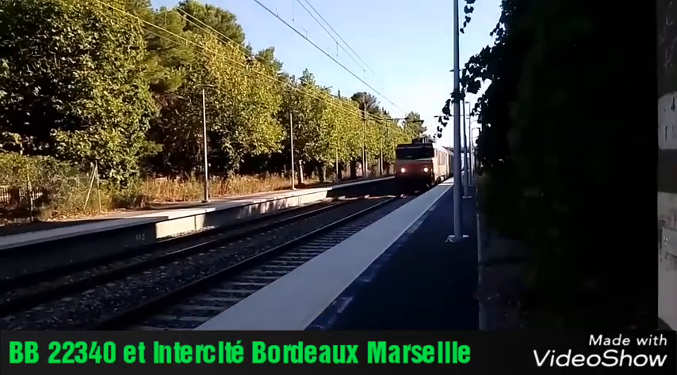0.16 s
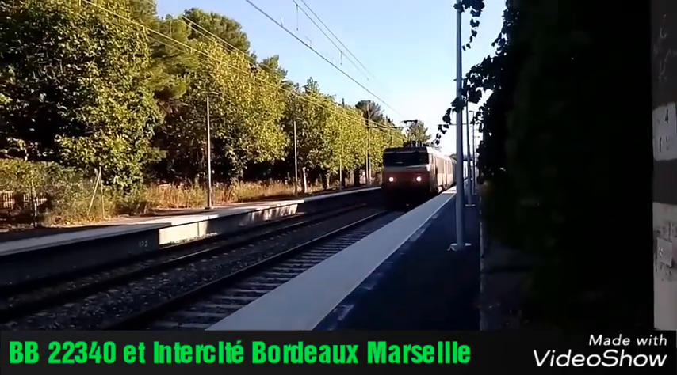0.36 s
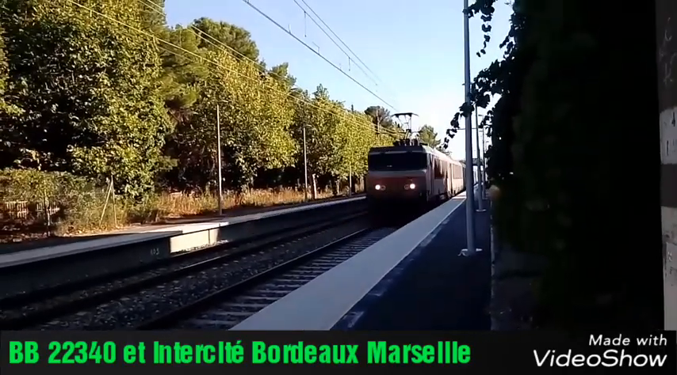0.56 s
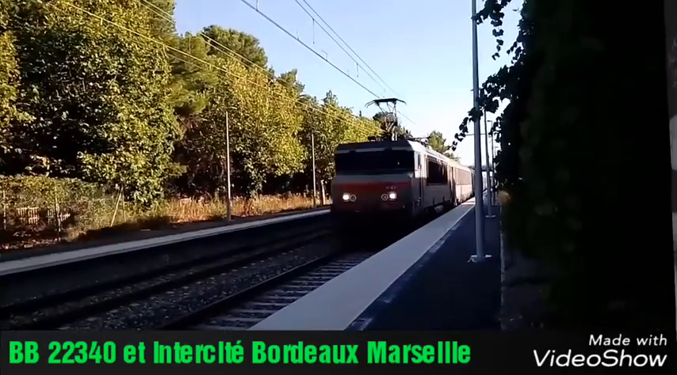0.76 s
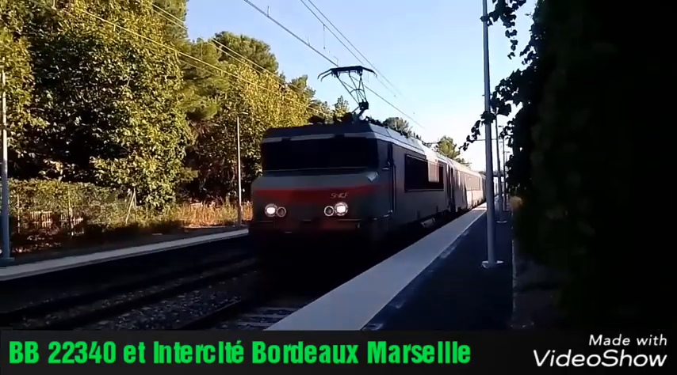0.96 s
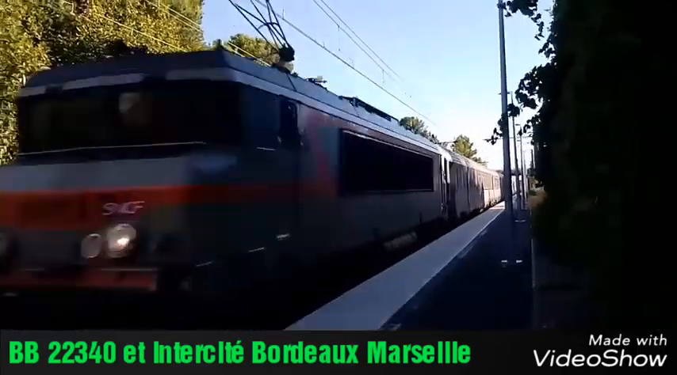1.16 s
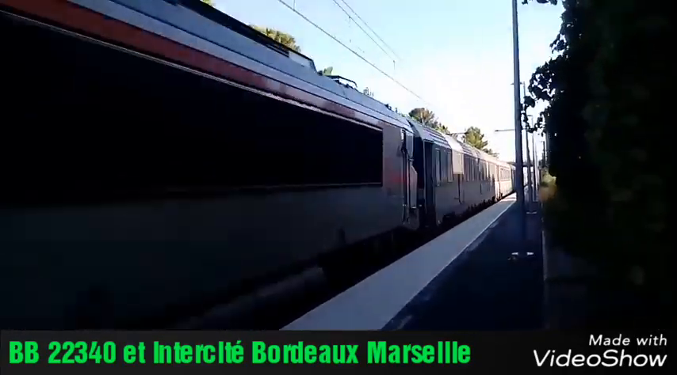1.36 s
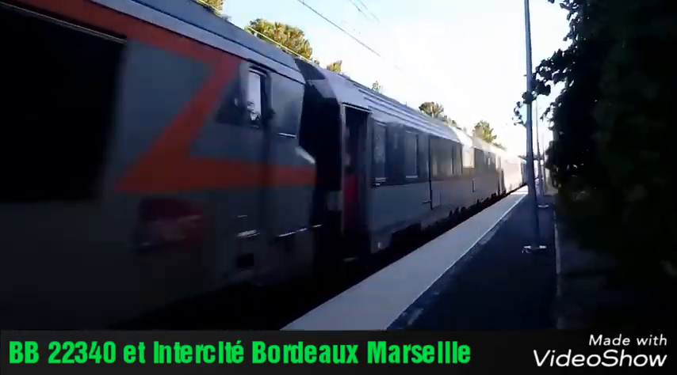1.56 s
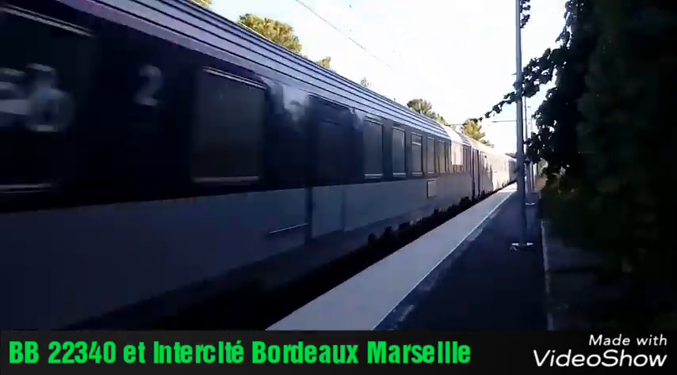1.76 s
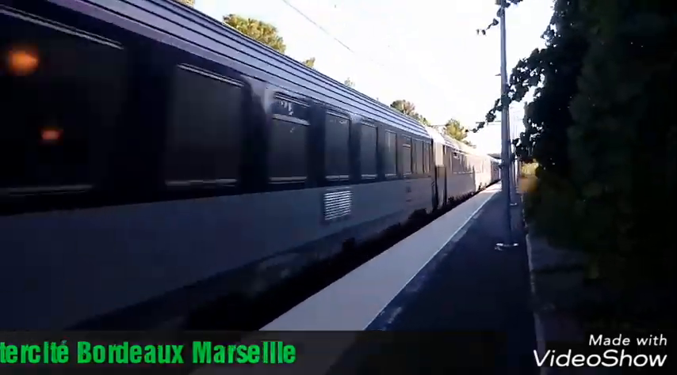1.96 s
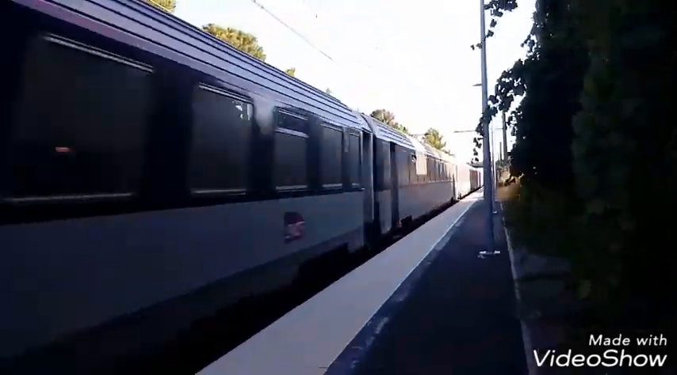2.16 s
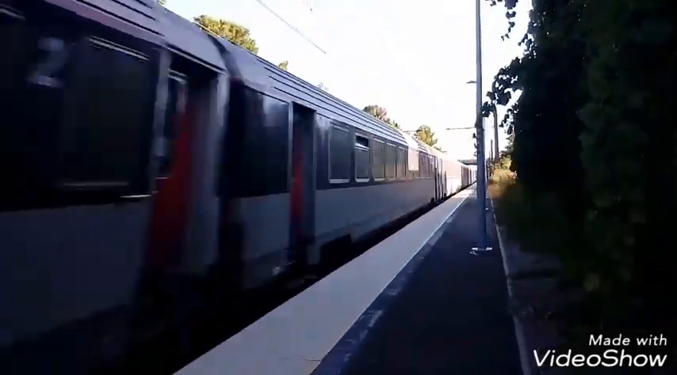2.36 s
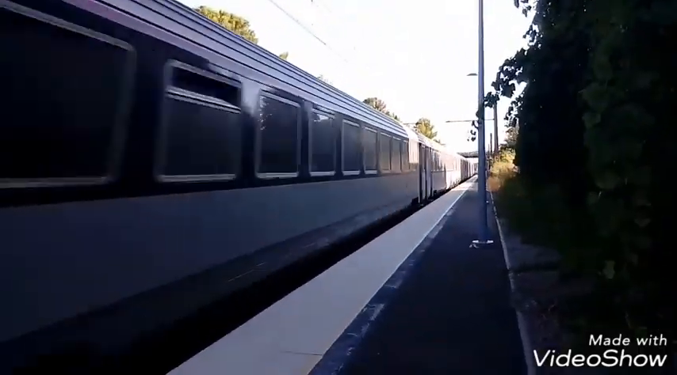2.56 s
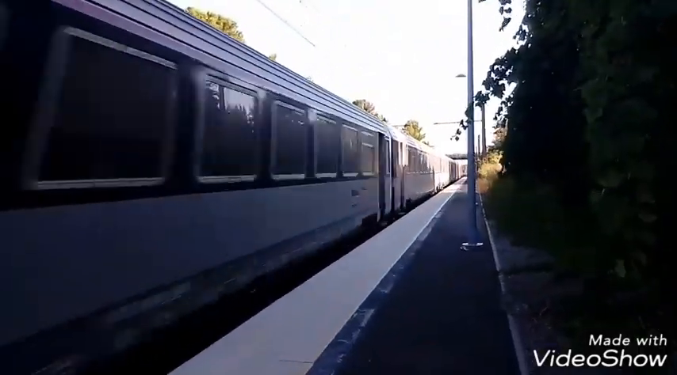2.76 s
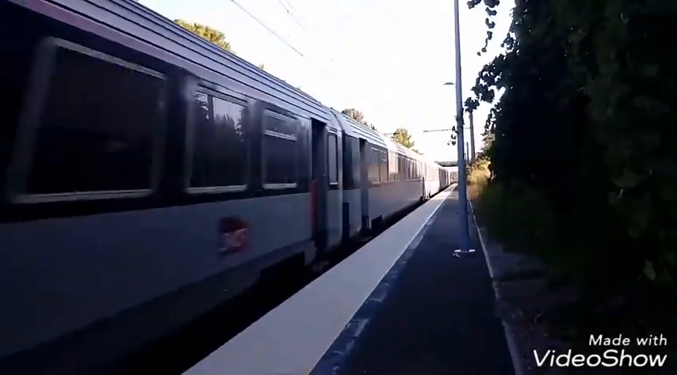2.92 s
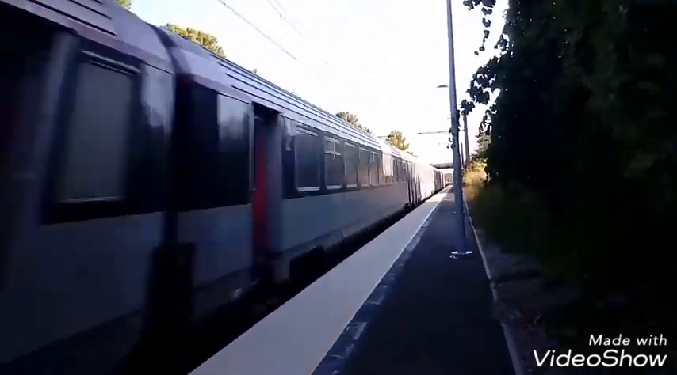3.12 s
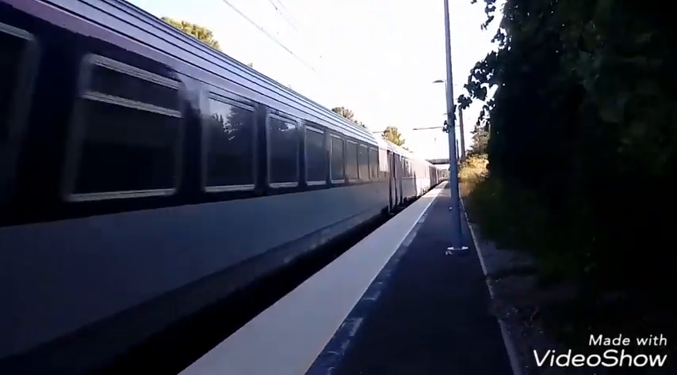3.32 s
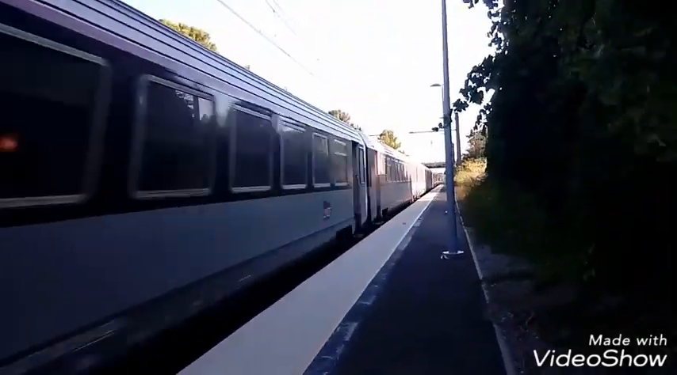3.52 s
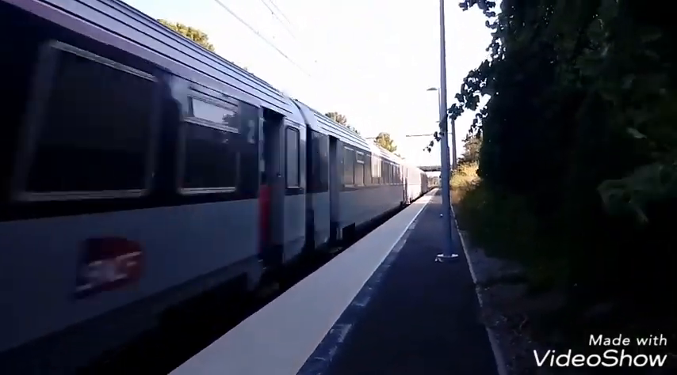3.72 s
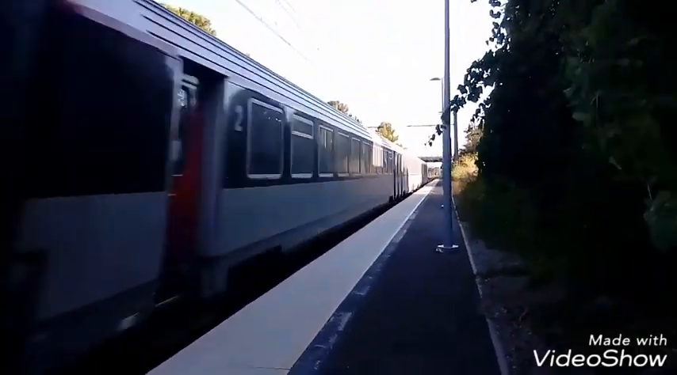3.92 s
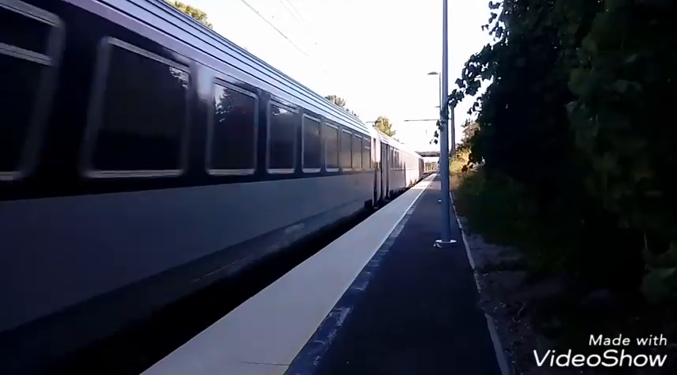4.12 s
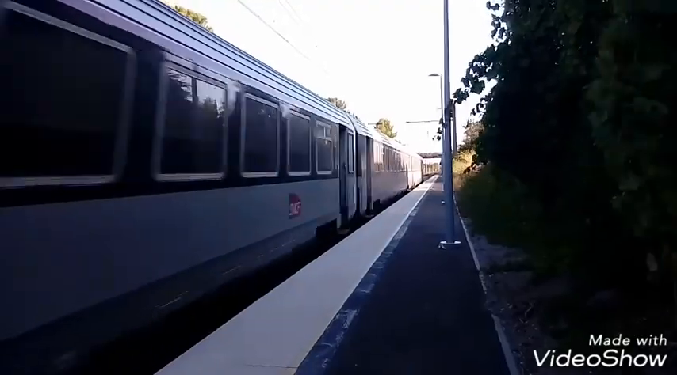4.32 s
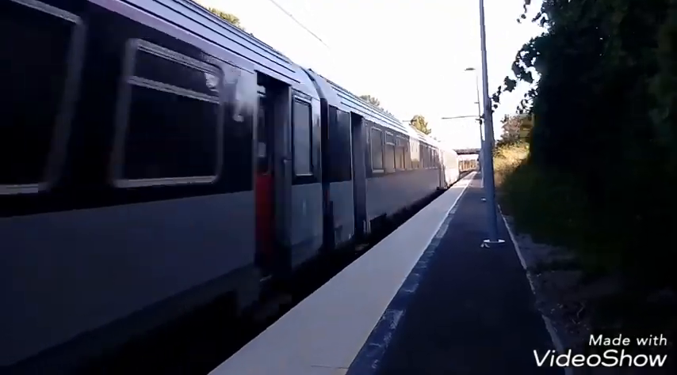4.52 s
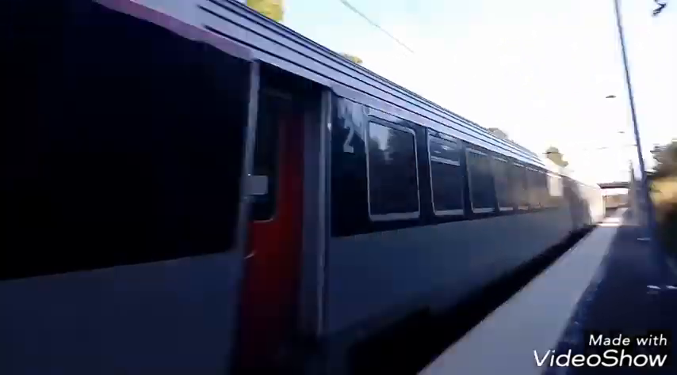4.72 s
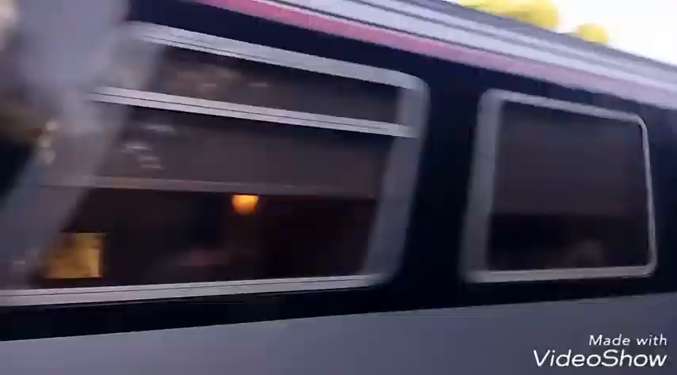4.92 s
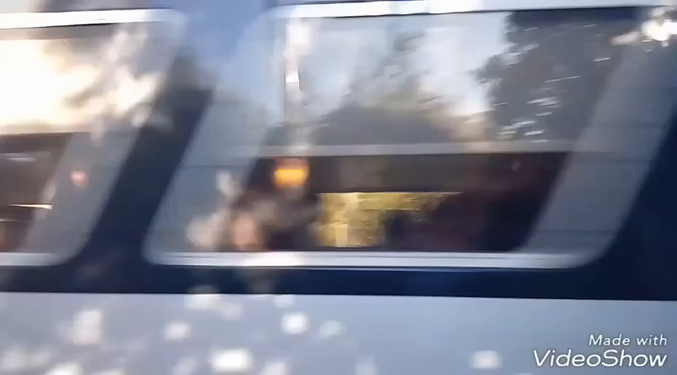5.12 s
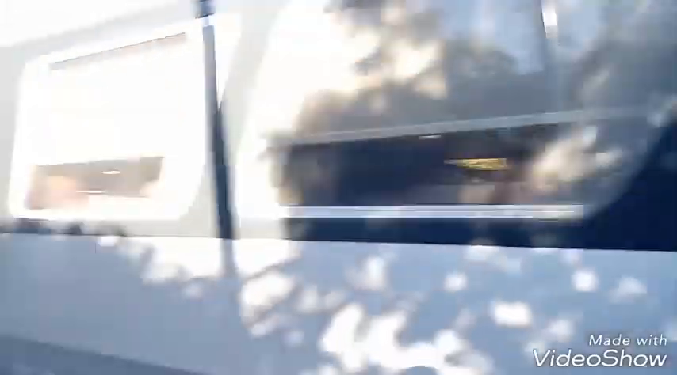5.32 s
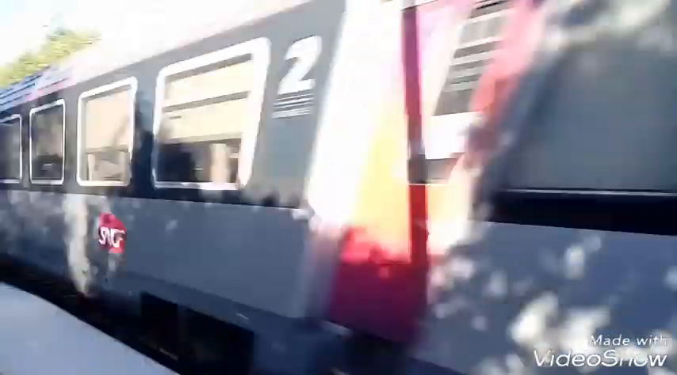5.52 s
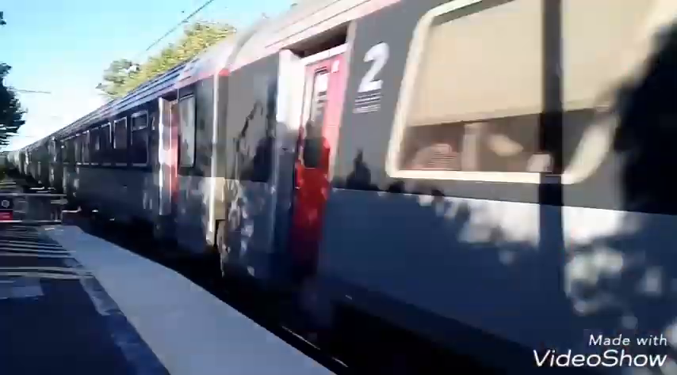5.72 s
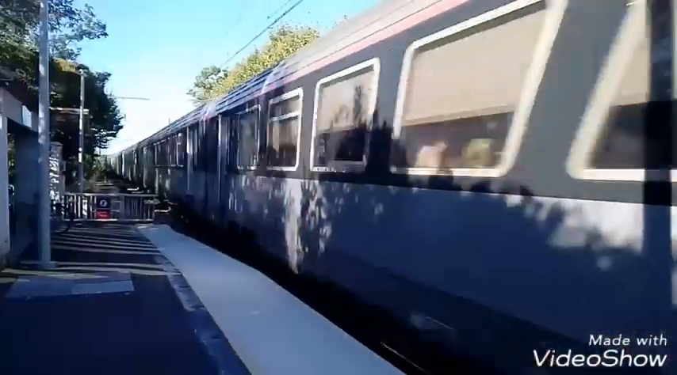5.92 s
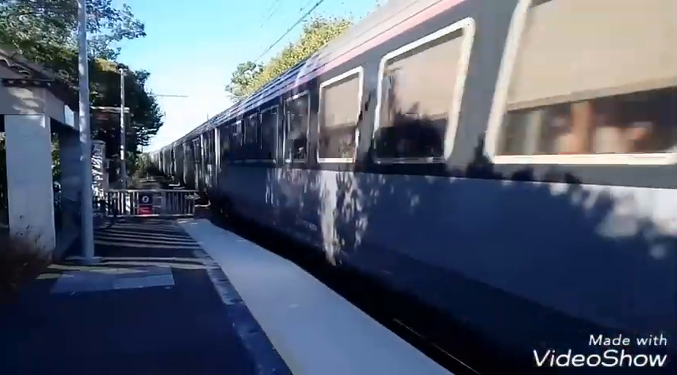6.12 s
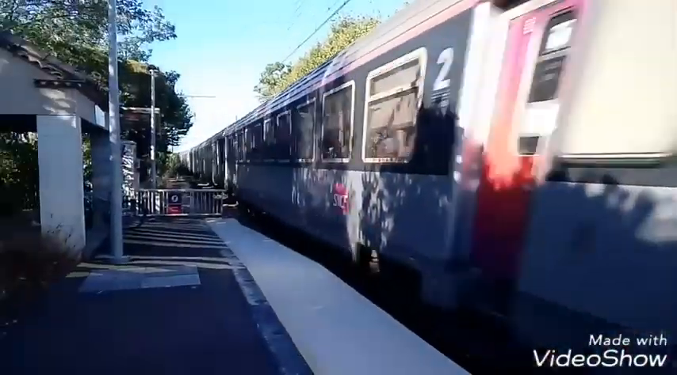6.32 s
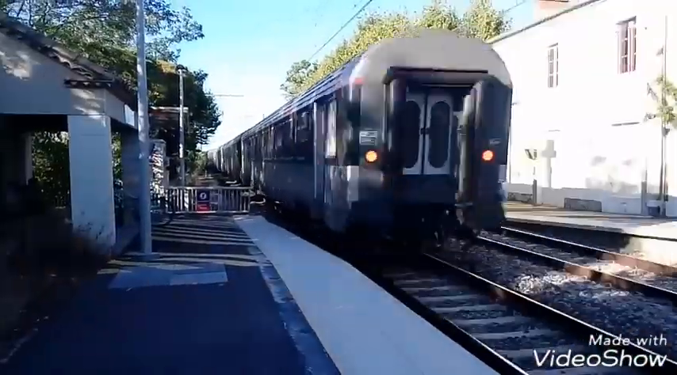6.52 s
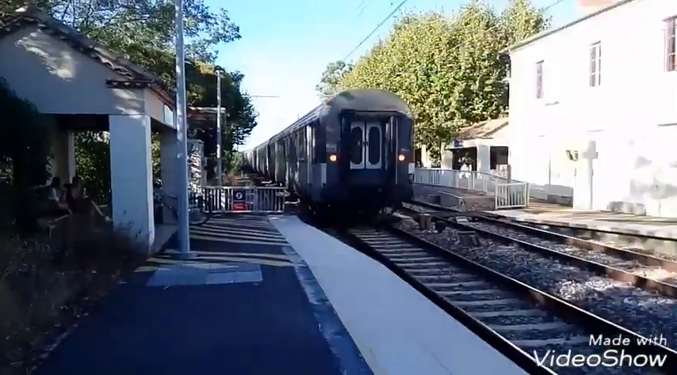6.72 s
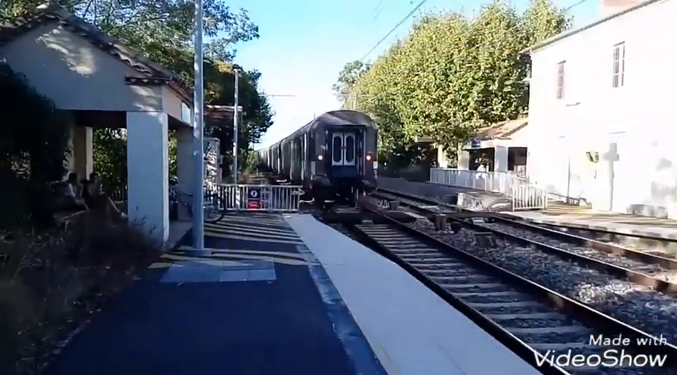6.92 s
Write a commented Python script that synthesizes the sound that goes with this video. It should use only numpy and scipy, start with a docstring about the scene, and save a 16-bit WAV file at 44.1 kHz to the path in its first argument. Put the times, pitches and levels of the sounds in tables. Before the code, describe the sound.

Rails sing as a fast train approaches, then it passes with a rumble, a hissing roar, pulsing wheel whine and thumping wind.

```python
"""Electric train passing a platform

The rails sing ahead of the train, then the locomotive rumbles and hums past a few metres away.
Rough wheels on rough rails make the track roar and hiss; each bogie's wheels ring, falling in pitch
by the Doppler effect, and a flange sometimes brushes the rail. The turbulent slipstream buffets a
single microphone in gusts, and their heavy bass drives its gain down."""
import sys
import numpy as np
from scipy import signal
from scipy.fft import rfft, irfft, next_fast_len
from scipy.io import wavfile
from scipy.ndimage import uniform_filter1d

SR = 44100
rng = np.random.default_rng(int(sys.argv[2]) if len(sys.argv) > 2 else 0)


def output_pcm(signal):
    """Save a mono or channel-first signal as 16-bit PCM at the path in sys.argv[1].

    Samples are clipped to [-1, 1] before scaling.
    """
    pcm = np.clip(np.atleast_2d(signal).T, -1, 1) * 32767
    wavfile.write(sys.argv[1], SR, np.round(pcm).astype(np.int16))


N = 307377
TIME = np.arange(N) / SR
SPEED_M_S, SOUND_M_S = 35.0, 343
TRACK_M, AXLE_SPACING_M = 4.6, 2.5  # listener to track, axle to axle
# passing bogies: t/s when abreast, whine f/Hz at rest, ring level/dB, hiss level/dB
BOGIES = [(1.96, 1814, -44.5, -33), (2.15, 1783, -30.5, -27), (2.6, 1810, -28, -28), (2.83, 1836, -29, -29),
          (3.35, 1790, -34.5, -35), (3.57, 1768, -30.5, -35), (4.1, 1776, -25, -32),
          (4.311, 1760, -24.5, -36), (4.79, 1785, -26, -34), (5.052, 1742, -26, -32.5),
          (5.57, 1787, -33.5, -33), (5.821, 1730, -27.5, -30.5), (6.371, 1820, -26, -26.5)]


def from_db(db):
    """Amplitude ratio of a level: 20 dB to a factor of ten."""
    return 10 ** (np.asarray(db) / 20)


def unit_rms(x):
    """Normalisation to unit mean power."""
    return x / np.sqrt(np.mean(x ** 2) + 1e-20)


def in_time(rows):
    """Linear interpolation of each level column at every sample."""
    t, *columns = np.transpose(rows)
    return [np.interp(TIME, t, column) for column in columns]


def fade_out(at_s, length_s):
    """A smooth (tanh) step from one to zero."""
    return .5 - .5 * np.tanh((TIME - at_s) / length_s)


def swell(at_s, sigma_s):
    """A Gaussian envelope of unit height."""
    return np.exp(-.5 * ((TIME - at_s) / sigma_s) ** 2)


def swells(rows):
    """Superposition of Gaussian envelopes, from rows of t/s, level/dB, sigma/s."""
    return sum(from_db(db) * swell(t, sigma) for t, db, sigma in rows)


def drift(rate_hz):
    """Random modulation of unit RMS: white noise through a two-pole low-pass."""
    step, settling = 40, 2000  # computed at every 40th sample
    pole = np.exp(-2 * np.pi * step * rate_hz / SR)
    white = rng.standard_normal(N // step + settling + 2)
    slow = signal.lfilter([1], [1, -2 * pole, pole * pole], white)[settling:]
    return np.interp(np.arange(N) / step, np.arange(len(slow)), unit_rms(slow))


def noise(spectrum):
    """Spectral shaping of white noise, to unit power; rows of f/Hz, relative level/dB."""
    size = next_fast_len(N)
    hz = np.maximum(np.arange(size // 2 + 1) * SR / size, 1)
    points, db = np.transpose(spectrum)
    gain = from_db(np.interp(np.log(hz), np.log(points), db))
    skirts = np.minimum(1, np.minimum(hz / points[0], points[-1] / hz)) ** 2
    return unit_rms(irfft(rfft(rng.standard_normal(size)) * gain * skirts)[:N])


def evened(x, span_s):
    """Division by the running RMS holds the power of a noise steady."""
    return x / np.sqrt(uniform_filter1d(x ** 2, int(span_s * SR)) + 1e-6)


def flutter(x, split_hz=900, depth_db=1.3):
    """Amplitude modulation: the low and high bands surge independently."""
    low = signal.sosfiltfilt(signal.butter(4, split_hz, fs=SR, output="sos"), x)
    return sum(band * unit_rms(from_db(depth_db * drift(14))) for band in (low, x - low))


def resonance(hz, width_hz, doppler=1):
    """A randomly driven mode: amplitude and phase wander at a rate set by its bandwidth."""
    phase = 2 * np.pi * np.cumsum(hz * doppler * np.ones(N)) / SR
    return (drift(width_hz) * np.cos(phase) + drift(width_hz) * np.sin(phase)) / np.sqrt(2)


def hum(hz, width_hz, pitch_ratio):
    """Forced vibration: a sustained tone wavering in frequency and amplitude."""
    phase = 2 * np.pi * np.cumsum(hz * pitch_ratio + width_hz * drift(2 * width_hz)) / SR
    return unit_rms(np.sin(phase) * from_db(4.3 * drift(18)))


def fly_by(abreast_s, distance_m):
    """Spherical spreading (one when abreast) and Doppler factor of a point on the train."""
    along = SPEED_M_S * (TIME - abreast_s)
    reach = np.hypot(along, distance_m)
    return distance_m / reach, 1 / (1 + SPEED_M_S / SOUND_M_S * along / reach)


def singing_rails():
    """As waveguides the rails carry vibration ahead of the train; they also ring out as it passes."""
    # rail modes: f/Hz, width/Hz, initial level/dB
    modes = [(744, 30, -46), (1142, 14, -39.5), (1207, 26, -44), (1328, 30, -44), (1837, 50, -42.5),
             (3105, 60, -44.5), (4210, 130, -51.5)]
    # brief rings: t/s, nominal f/Hz, width/Hz, level/dB, sigma/s
    rings = [(.54, 1215, 9, -37.5, .07), (.74, 1220, 9, -34, .05), (.79, 1145, 6, -37, .07),
             (1.86, 2620, 80, -35, .06), (1.93, 3110, 80, -34, .05), (2.36, 985, 6, -28.5, .08),
             (2.53, 4170, 120, -35, .05), (2.79, 4170, 100, -34.5, .04), (4.02, 3900, 400, -32, .025),
             (4.085, 1825, 8, -25, .022), (5.14, 1090, 6, -24.5, .035), (5.29, 1010, 6, -24.5, .045),
             (5.42, 1028, 6, -21.5, .055), (6.13, 2620, 65, -36, .12), (6.22, 3430, 90, -40, .14),
             (6.33, 4260, 55, -39.5, .3), (6.6, 2390, 50, -38.5, .14), (6.63, 1840, 22, -27, .09),
             (6.68, 3350, 50, -42, .13)]
    ahead = sum(from_db(db + 2.2 * drift(5)) * resonance(hz, width) for hz, width, db in modes)
    approach = from_db(5.1 * np.minimum(TIME, 1)) * fade_out(1.1, .35)
    ringing = sum(from_db(db) * swell(t, sigma) * hum(hz, width, pitch_ratio=.99)
                  for t, hz, width, db, sigma in rings)
    return ahead * approach + ringing


def wind_level():
    """Gusts and a light steady draught add in power; the result is in dB."""
    # gusts: onset t/s, duration/s, level/dB
    gusts = [(2.1, 0.63, -35), (3.035, 0.29, -32), (3.524, 0.042, -17.5), (3.605, 0.19, -15),
             (3.805, 0.052, -17.5), (3.882, 0.14, -23), (4, 0.065, -25.5), (4.103, 0.028, -24.5),
             (4.226, 0.099, -27.5), (4.462, 0.2, -28.5), (5.378, 0.075, -25), (5.487, 0.076, -30),
             (5.608, 0.16, -30), (5.767, 0.13, -25), (6, 0.31, -24.5), (6.394, 0.16, -27.5),
             (6.563, 0.22, -38), (6.721, 0.22, -21.5)]
    attack_s, release_s, draught_db = .017, .067, -42.5
    strength = sum(from_db(db) * (1 - fade_out(t, attack_s)) * fade_out(t + length, release_s)
                   for t, length, db in gusts)
    return 20 * np.log10(np.hypot(strength, from_db(draught_db)))


def slipstream():
    """Turbulent pressure thumps the microphone; the harder the gust, the brighter its spectrum."""
    # sharp blasts of air: t/s, level/dB, sigma/s
    blast_times = [(3.575, -24, .008), (3.607, -17.5, .006), (3.629, -16.5, 0.007), (3.658, -15.5, 0.005),
                   (3.672, -18.5, .004), (3.696, -18, .005), (3.718, -20, .008), (3.805, -21, .012),
                   (3.883, -16, .006), (3.899, -13, 0.007), (3.925, -20.5, .006), (3.95, -19.5, .004),
                   (3.964, -17, 0.007), (4.004, -21, .006), (4.1, -19.5, 0.005), (4.125, -24, .005),
                   (4.24, -27, 0.007), (5.42, -17.5, 0.008), (6.03, -27, .007), (6.211, -18, 0.006),
                   (6.819, -20, 0.006), (6.935, -23, .008)]
    # spectra of buffeting, finer turbulence, blasts and wake: f/Hz, relative level/dB
    buffet_spectrum = [(22, -18), (40, -19), (65, -2.5), (110, 2), (170, 0), (250, -7), (400, -12.5),
                       (800, -21.5)]
    churn_spectrum = [(50, -13), (120, -12), (250, 6), (450, -0.5), (700, -4.5), (1500, -7.5),
                      (4000, -48.5)]
    blast_spectrum = [(55, -7), (100, -5), (200, 0), (320, -1.5), (520, 1), (750, -3), (1000, -10),
                      (1600, -22)]
    wake_spectrum = [(130, -9), (230, 8), (300, 1), (450, -27)]
    wind_db = wind_level()
    arrived = 1 - fade_out(2.1, .1)
    eddies = from_db(2.7 * drift(38) - 3.5)
    gusting = 1 / (1 + from_db(-39.5 - wind_db) ** 2)  # deepens the lulls
    buffet = from_db(wind_db) * evened(noise(buffet_spectrum), .03)
    churn = from_db(1.59 * wind_db + 7.5) * noise(churn_spectrum)
    blasts = swells(blast_times) * evened(noise(blast_spectrum), .018)
    wake = from_db(-29) * swell(6.88, .08) * noise(wake_spectrum)  # behind the last coach
    return (buffet + churn) * gusting * eddies * arrived + blasts + wake


def crackles(top_hz=5200):
    """Cracks in the strongest gust: exponentially decaying noise, coloured by resonant filters."""
    # cracks: t/s, level/dB, decay time/s, f/Hz, width/Hz
    cracks = [(3.651, -19, .003, 4000, 3000), (3.66, -17, .015, 1100, 900), (3.692, -14, .014, 1900, 1300),
              (3.7145, -14, .003, 2600, 2600), (3.722, -12, .012, 1600, 1900),
              (3.74, -16.5, .004, 4000, 3000), (3.76, -11, .002, 1800, 1100), (3.78, -20, .02, 1700, 1200),
              (3.801, -8, .005, 2400, 1700), (3.81, -19, .03, 1400, 900)]
    out, white = 0, rng.standard_normal(N)
    for t, db, decay_s, hz, width in cracks:
        decay = np.exp(-np.minimum(np.abs(TIME - t) / decay_s, 20))
        burst = from_db(db) * (TIME >= t) * decay * white
        peak = signal.iirpeak(hz, hz / width, fs=SR)
        band = signal.lfilter(*peak, signal.lfilter(*peak, burst))
        out += band * np.sqrt(2 * SR / (np.pi * width))  # restores the power lost in filtering
    return signal.sosfilt(signal.butter(6, top_hz, fs=SR, output="sos"), out)


def flanges(distance_m=8.0):
    """Friction of a flange on the rail head hisses and excites wheel modes, which fall in pitch."""
    # brushing contacts: t/s, level/dB, sigma/s
    brushes = [(2.864, -33, 0.057), (5.713, -35.5, 0.14)]
    # their hiss: f/Hz, relative level/dB
    spectrum = [(3900, -12), (4450, 11), (4900, 7), (5500, -18.5)]
    # wheel rings: t/s, f/Hz at rest, width/Hz, level/dB, sigma/s
    rings = [(2.52, 2540, 80, -35, .07), (2.8, 1845, 25, -27.5, .035), (3.32, 1890, 30, -28, .05),
             (4.74, 1850, 30, -28, .07), (5.72, 2630, 38, -31, .1), (5.77, 3210, 80, -34, .11),
             (5.78, 4560, 140, -37.5, .09), (6.3, 2440, 70, -33.5, .07), (6.35, 3060, 100, -33.5, .05)]
    hiss = swells(brushes) * noise(spectrum)
    ringing = sum(from_db(db) * swell(t, sigma) * resonance(hz, width, fly_by(t, distance_m)[1])
                  for t, hz, width, db, sigma in rings)
    return hiss + ringing


def machinery():
    """Blowers, motors and running gear hum past, their pitch lowered by the Doppler effect."""
    # moving tones: t/s when abreast, f/Hz at rest, width/Hz, level/dB, distance/m
    tones = [(1.55, 674, 10, -28.5, 7), (1.68, 634, 4, -29, 3), (1.8, 680, 14, -32, 8),
             (1.55, 205, 12, -32, 14), (1.6, 60.35, 4, -35.5, 16), (3.28, 252, 3, -31, 1.9),
             (3.1, 975, 12, -29, 4), (6.95, 3260, 70, -43, 3.4)]
    out = 0
    for t, hz, width, db, distance_m in tones:
        nearness, doppler = fly_by(t, distance_m)
        unscreened = fade_out(t + .2, .08)  # the next vehicle soon hides the source
        out += from_db(db) * nearness * unscreened * hum(hz, width, doppler)
    return out


def locomotive():
    """Broadband noise: a heavy rumble and a gritty rush of air, gone once the coaches arrive."""
    # approach: t/s, rumble level/dB, air level/dB
    levels = [(0, -39, -47.5), (0.45, -38.5, -41), (0.8, -30, -37), (1.25, -26, -33.5), (1.55, -20.5, -32),
              (1.8, -25, -32.5), (1.95, -31, -32)]
    # spurts of air: t/s, level rise/dB, sigma/s
    spurts = [(.99, 3.5, .03), (1.12, 4, .02), (1.225, 4.5, .018), (1.335, 7, .02), (1.46, 2.5, .02),
              (1.575, 5, .028), (1.76, 4.5, .028)]
    # spectra of rumble and air: f/Hz, relative level/dB
    rumble_spectrum = [(25, -30), (45, -37), (65, 1.5), (100, -3), (150, 1.5), (215, 5), (320, -0.5),
                       (450, -8), (700, -1.5), (1400, -17)]
    air_spectrum = [(2500, -8), (3800, 0), (4500, 1.5), (5500, 1), (6300, 1), (7000, -9), (7700, -16.5)]
    rumble_db, air_db = in_time(levels)
    spurts_db = sum(db * swell(t, sigma) for t, db, sigma in spurts)
    grit = unit_rms(from_db(2 * drift(120)))
    rumble = from_db(rumble_db) * noise(rumble_spectrum)
    air = from_db(air_db + spurts_db) * grit * noise(air_spectrum)
    return rumble * fade_out(2.08, .1) + air * fade_out(1.8, .1)


def contact_hiss(train_db, roughness):
    """Incoherent sources add in power: the contact patches of each bogie and of the whole train."""
    # hiss: f/Hz, relative level/dB
    spectrum = [(1200, -16), (2100, 3.5), (2600, 4.5), (2850, 1.5), (3150, 4), (3750, 1), (4200, 3),
                (4600, -0.5), (5200, -4), (6300, -11), (7000, -19.5), (7600, -53)]
    # brief dips: t/s, level change/dB, sigma/s
    dips = [(3.81, -4.5, .1), (6.85, -2, .07)]
    lead_s, directivity = .082, 1.73  # loudest just before abreast, radiating mostly sideways
    near_power = sum((from_db(db) * fly_by(t - lead_s, TRACK_M)[0] ** directivity) ** 2
                     for t, _, _, db in BOGIES)
    amplitude = np.sqrt(from_db(train_db) ** 2 + near_power)
    surge_db = .5 * roughness + .6 * drift(7)  # patches of rough rail
    dips_db = sum(db * swell(t, sigma) for t, db, sigma in dips)
    return amplitude * from_db(surge_db + dips_db) * noise(spectrum)


def wheels(whine_width_hz=24, flicker_db=3):
    """Rough treads excite wheel modes; the Doppler shift lowers each axle's whine in turn."""
    # weaker wheel modes: f/Hz at rest, width/Hz, level/dB re the whine
    modes = [(1745, 110, -4.5), (2560, 54, -12.5), (3205, 90, -10.5), (4330, 120, -15.5)]
    lead_s, directivity = .0051, 1.67
    out, half_gap_s = 0, AXLE_SPACING_M / SPEED_M_S / 2
    for t, whine_hz, db, _ in BOGIES:
        _, doppler = fly_by(t, TRACK_M)
        nearness, _ = fly_by(t - lead_s, TRACK_M)
        whine = 0
        for axle_s in (t - half_gap_s, t + half_gap_s):
            _, axle_doppler = fly_by(axle_s, TRACK_M)
            whine += hum(whine_hz, whine_width_hz, axle_doppler) * from_db(flicker_db * drift(9))
        ringing = sum(from_db(level) * resonance(hz, width, doppler) for hz, width, level in modes)
        out += from_db(db) * nearness ** directivity * unit_rms(unit_rms(whine) + ringing)
    return out


def rolling():
    """Rolling noise: surface roughness makes track roar, rail and wheels ring, and contacts hiss."""
    # roar, growing as the train nears and holding while the coaches pass: t/s, level/dB
    levels = [(0, -33), (0.3, -32), (0.8, -29), (1.5, -25.5), (1.82, -21), (2.4, -20), (3.25, -20),
              (3.6, -20.5), (3.95, -18), (4.12, -21.5), (4.3, -20), (5.35, -19.5), (5.8, -20.5),
              (6.97, -21)]
    # spectra of near roar, distant roar and ringing rail: f/Hz, relative level/dB
    near_spectrum = [(60, -17), (250, -20), (400, -16.5), (520, -11), (660, -4.5), (800, -0.5), (980, 2.5),
                     (1120, -1.5), (1300, -6.5), (1500, -8), (1950, -7), (2200, -36), (4000, -60)]
    far_spectrum = [(50, -2.5), (120, -20.5), (300, -6), (420, -4), (620, 0.5), (800, 1), (980, -2.5),
                    (1400, -2.5), (1600, -6), (2000, -9), (2300, -24.5), (4000, -46.5)]
    rail_spectrum = [(1450, -26.5), (1620, 11.5), (1820, 11), (1980, -4), (2150, -31)]
    roar_db, = in_time(levels)
    roughness = drift(7.1)
    distant = fade_out(1.35, .35)
    track = np.sqrt(1 - distant) * noise(near_spectrum) + .76 * np.sqrt(distant) * noise(far_spectrum)
    roar = from_db(roar_db + .5 * roughness) * flutter(track)
    rail = from_db(roar_db - 12 - 20 * distant) * noise(rail_spectrum)  # at rest: no Doppler shift
    hiss = contact_hiss(roar_db - 10 - .5 * distant, roughness)
    return roar + rail + hiss + wheels()


def scene():
    """Superposition at one microphone, which feeds both channels alike."""
    train = rolling() + flanges() + singing_rails() + machinery() + locomotive()
    mono = train + slipstream() + crackles()
    return np.array([mono, mono])


def gain_control(x, bass_hz=362, threshold_db=-25.5, response_s=.06, slope=.68):
    """Compression: the gain falls while the smoothed bass power exceeds a threshold."""
    bass = signal.sosfilt(signal.butter(2, bass_hz, fs=SR, output="sos"), x[0])
    pole = np.exp(-1 / (response_s * SR))
    bass_db = 10 * np.log10(signal.lfilter([1 - pole], [1, -pole], bass ** 2) + 1e-12)
    return x * from_db(-slope * np.maximum(bass_db - threshold_db, 0))


def record(dry, ceiling=.43, cutoff_hz=7500):
    """Compression ducks the level, saturation rounds the peaks and a steep low-pass cuts the top."""
    held = gain_control(dry)
    rounded = held / (1 + (held / ceiling) ** 6) ** (1 / 6)
    return signal.sosfilt(signal.ellip(10, .1, 80, cutoff_hz, fs=SR, output="sos"), rounded)


dry = scene()
out = record(dry)
output_pcm(out)
```